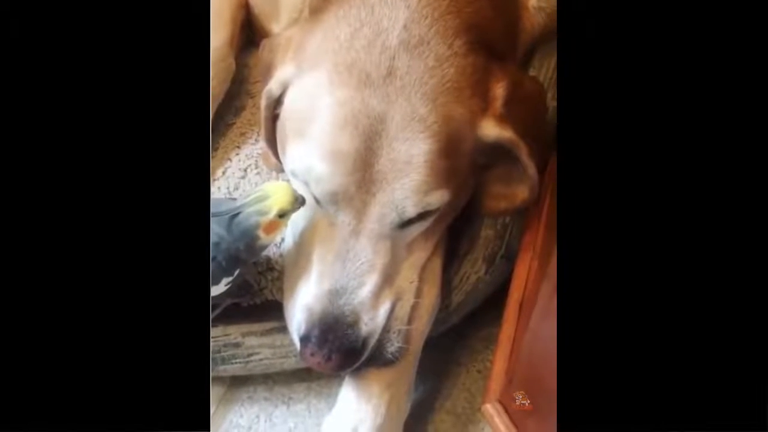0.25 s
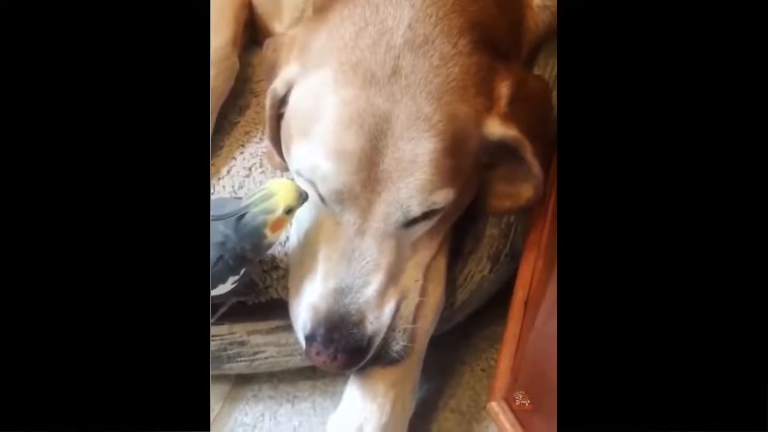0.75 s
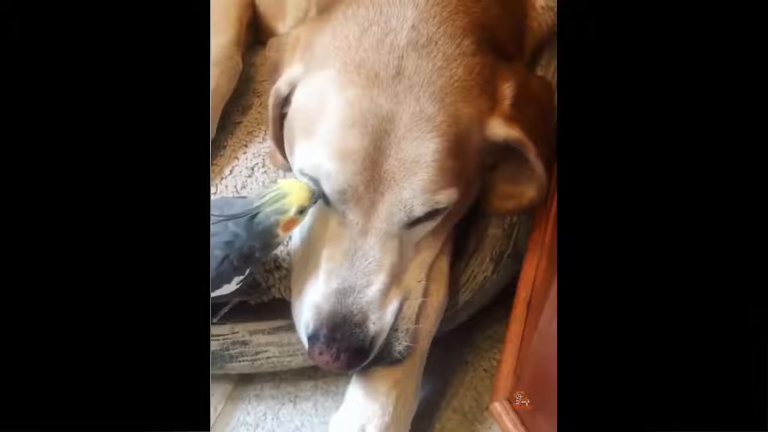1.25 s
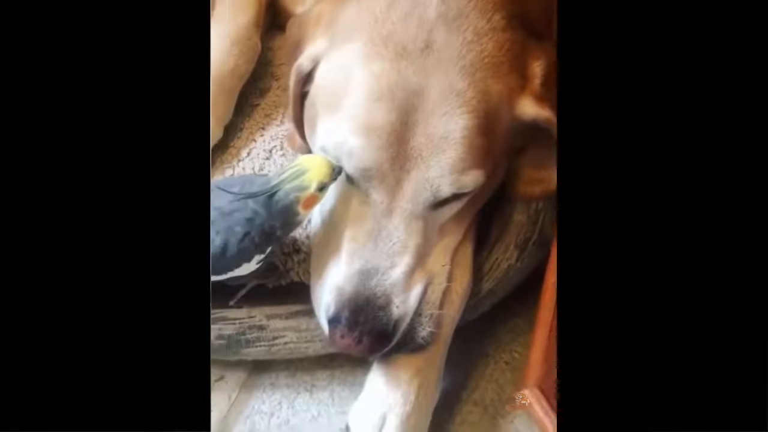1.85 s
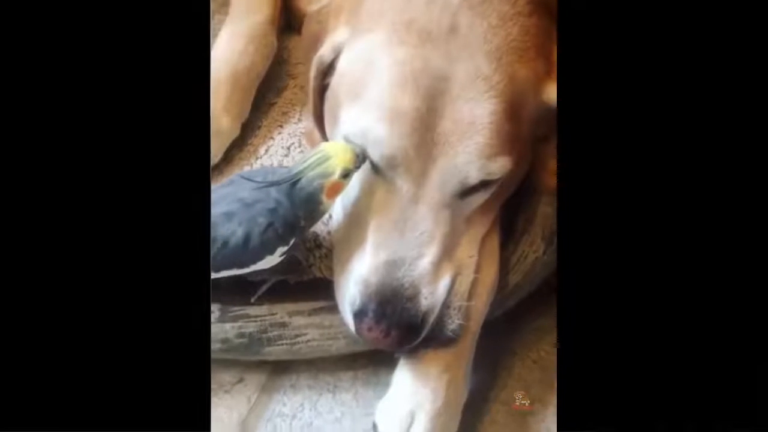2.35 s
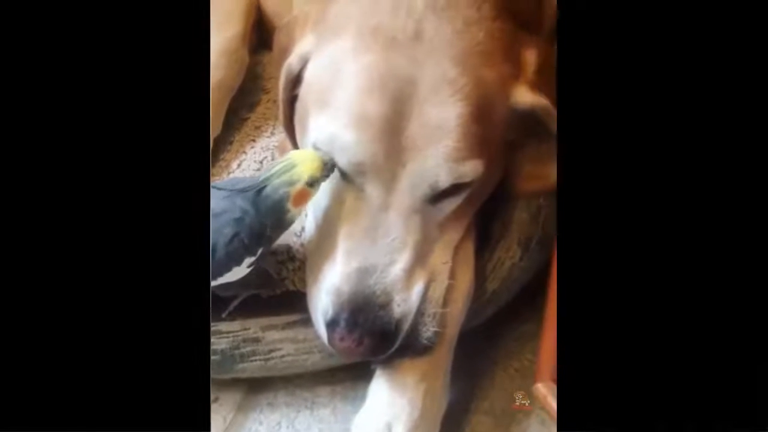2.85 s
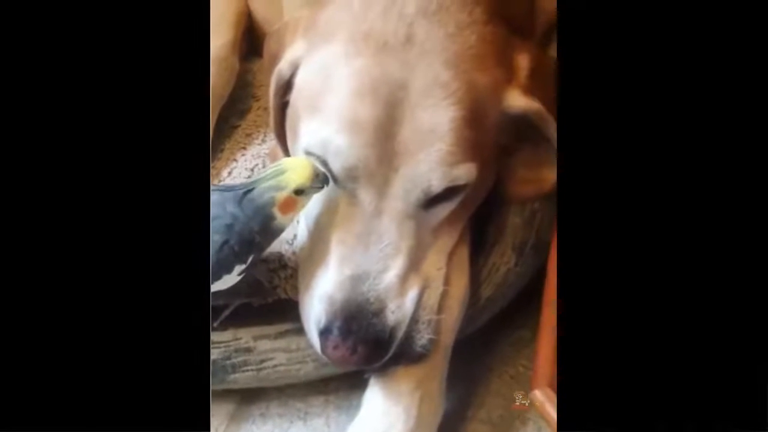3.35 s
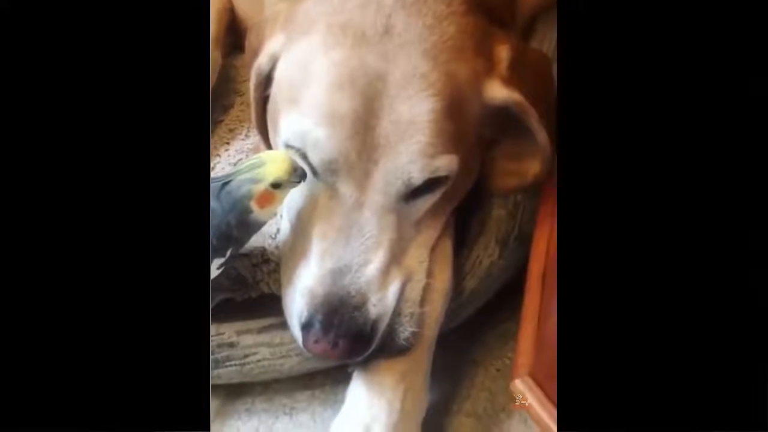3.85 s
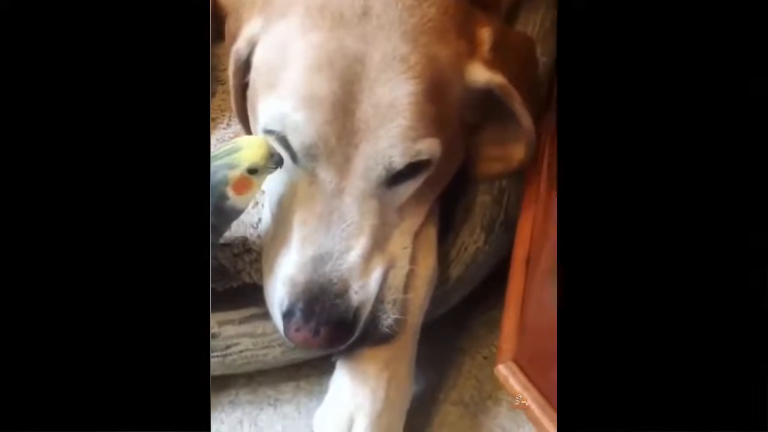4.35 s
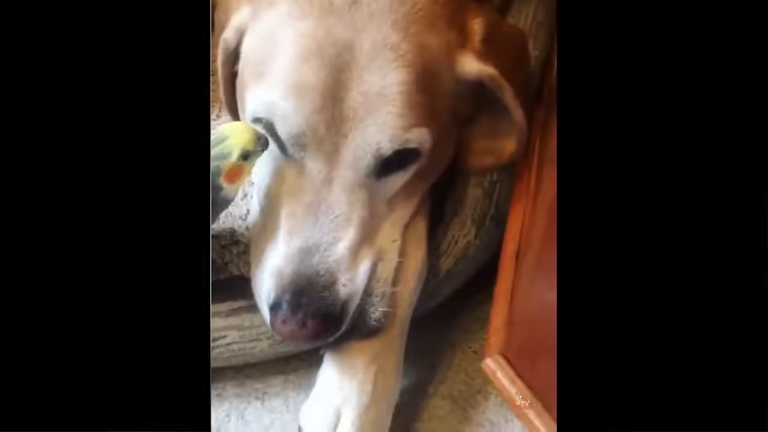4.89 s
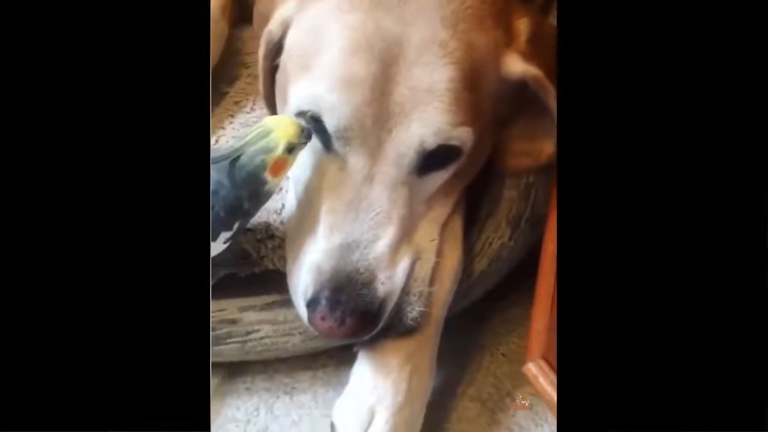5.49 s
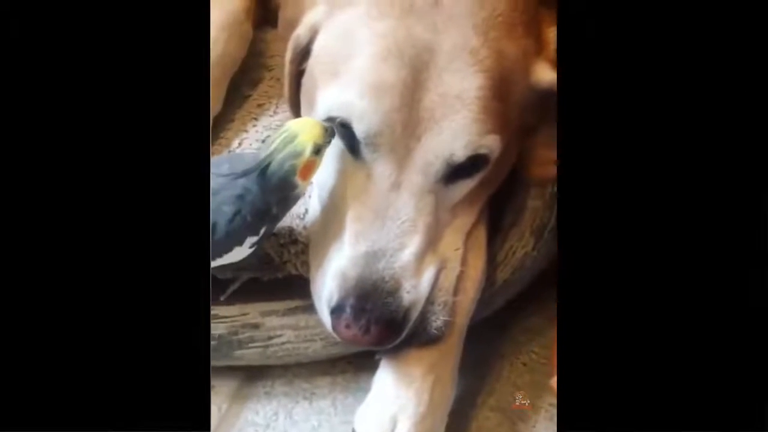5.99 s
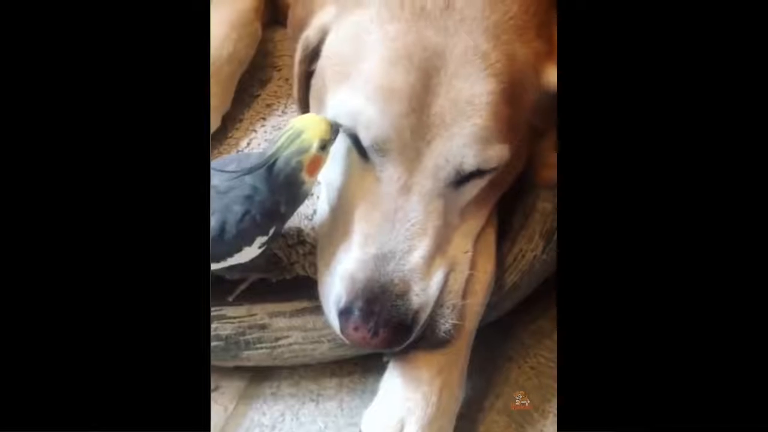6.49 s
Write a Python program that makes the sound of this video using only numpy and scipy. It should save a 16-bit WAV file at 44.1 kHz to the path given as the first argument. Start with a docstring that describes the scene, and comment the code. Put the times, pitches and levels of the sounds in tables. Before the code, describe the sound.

Indoors, close and clear, one small bird alternates slurred whistled warbles with quick dry chirps. Warbles fall from high to low, slightly rough and breathy; two long ones flick up at the end. Chirps come singly or in twos and threes, snapping on and turning pure. Reflections blur each note; low steady hum and a brief deep rumble sit far beneath.

```python
"""A cockatiel sings close by in a small quiet room: short whistled chirps in loose groups,
falling warbles, the longest curling up at the end, brief raspy squawks and one beak click.
The voice is a sine with unsteady overtones and hiss; the rasps are low, irregular pulses.
Noise echoes make each note linger between the walls, over filtered-noise room tone,
the low wavering sines of a household appliance and a deep rumble that swells briefly."""
import sys
import numpy as np
from scipy import signal
from scipy.fft import rfft, irfft
from scipy.io import wavfile
from scipy.ndimage import map_coordinates

SR = 44100
rng = np.random.default_rng(int(sys.argv[2]) if len(sys.argv) > 2 else 0)


def transcribe(u):
    """Save the signal u as a 16-bit wav file named by the first command-line argument.

    u: samples, shape (n,) or (channels, n), limited to [-1, 1]; the rate is SR.
    q: integer samples, one column per channel.
    """
    v = np.clip(np.atleast_2d(u).T, -1, 1)
    q = np.round(v * 32767).astype(np.int16)
    wavfile.write(sys.argv[1], SR, q)


N = 296793  # length in samples
ATTACK_S = .003  # opening of every chirp, warble and rasp


def undb(db):
    """Decibels to gain."""
    return 10 ** (np.asarray(db) / 20)


def unit(x):
    """Scale to rms 1."""
    return x / np.sqrt(np.mean(x ** 2))


def gain_at(hz, points):
    """Read a spectrum of (Hz, dB) points as a gain, interpolated along log frequency."""
    point_hz, point_db = np.transpose(points)
    return undb(np.interp(np.log(hz + 1), np.log(point_hz), point_db))


def colour(x, points):
    """Filter a sound by a spectrum of (Hz, dB) points, leaving its phases alone."""
    gain = gain_at(np.fft.rfftfreq(len(x), 1 / SR), points)
    return irfft(rfft(x) * gain, len(x))


def wander(n, rate):
    """Smooth random motion, spread near 1, with a new value rate times a second."""
    values = rng.standard_normal(4096)
    return map_coordinates(values, [np.arange(n) * rate / SR], order=3, mode="wrap")


def gate(n, attack_s, release_s):
    """Rounded opening and closing of a note."""
    t = np.arange(n) / SR
    opening = np.sin(np.pi / 2 * np.clip(t / attack_s, 0, 1))
    closing = np.sin(np.pi / 2 * np.clip((t[-1] - t) / release_s, 0, 1)) ** 2
    return opening * closing


def add(out, s, x):
    """Mix a sound in at time s."""
    i = max(int(s * SR), 0)
    out[i:i + len(x)] += x[:max(N - i, 0)]


def syrinx(hz, bright_db, press, jitter, flutter_db, hiss_db, slope_db=3.5, break_jitter=0.019):
    """A nearly pure whistle; pressing the throat brings out the octave, and it cracks as it lets go."""
    # Overtone strength against the fundamental, relaxed throat. Each row: frequency in Hz, gain in dB.
    relaxed = [(2500, -23), (3400, -27.5), (4400, -33.5), (5000, -38), (5700, -37), (7000, -39),
               (8200, -46), (9500, -33.5), (11000, -28), (12300, -15.5), (13500, -20.5)]
    # The same with the throat pressed. Each row: frequency in Hz, gain in dB.
    pressed = [(2800, -5), (3300, -6), (4500, -18), (6000, -24), (7500, -32), (8800, -40.5), (10500, -22),
               (12000, -16.5), (13800, -13)]
    # Spectrum of air hissing through the throat. Each row: frequency in Hz, relative level in dB.
    hiss_colour = [(400, -20.5), (900, -13), (1500, -1.5), (2500, -1), (4500, -8), (6500, -20.5),
                   (8200, -23.5), (10000, -18), (12500, -16.5), (14000, -26)]
    n = len(hz)
    unstable = 4 * press * (1 - press)  # greatest halfway between the two registers
    shake = jitter * wander(n, 700) + break_jitter * unstable * wander(n, 1500)
    phase = 2 * np.pi * np.cumsum(hz * (1 + shake)) / SR
    overtones = np.zeros(n)
    for k in range(2, 12):
        throat = gain_at(k * hz, relaxed) ** (1 - press) * gain_at(k * hz, pressed) ** press
        # each overtone is weaker than the last, so high notes reach the treble resonance more strongly
        strength = undb(flutter_db * wander(n, 140) - slope_db * (k - 2.5))
        below_nyquist = k * hz < SR / 2
        overtones += throat * strength * below_nyquist * np.sin(k * phase)
    breath = unit(colour(rng.standard_normal(n), hiss_colour))
    hiss = undb(hiss_db) * (0.25 + 0.96 * press + unstable) * breath
    return np.sqrt(2) * (np.sin(phase) + undb(bright_db) * (overtones + hiss))


def chirps(settle_db=2.5, late_db=5.0, build_s=0.0061):
    """Each chirp snaps on with a pressed throat, then flips into a tone that grows ever purer."""
    # Each row: start in seconds, length in seconds, held pitch in Hz, end pitch in Hz,
    # base level in dB, time the throat stays pressed in seconds, base overtone level in dB.
    chirp_notes = [ (1.477, 0.05647, 1667, 1529, -29.5, 0.012858, -4),
                   (1.827, 0.049704, 1544, 1506, -29, .014, -6),
                   (1.966, 0.03692, 1513, 1573, -30, 0.014933, 2),
                   (2.094, 0.042784, 1665, 1743, -29, 0.017721, 0),
                   (2.377, 0.053146, 1584, 1370, -29.5, 0.013692, -2.5),
                   (2.526, 0.044234, 1380, 1566, -33.5, 0.017156, 0),
                   (2.817, 0.06146, 1666, 1258, -29.5, 0.012573, -3.5),
                   (2.972, 0.036097, 1438, 1500, -29.5, 0.01701, -3),
                   (3.081, 0.039438, 1779, 1778, -28.5, .05, -2.5),
                   (3.335, .072, 1579, 1174, -28.5, .008, -4),
                   (4.888, 0.050727, 1544, 1524, -28, 0.012543, -3),
                   (5.228, 0.046244, 1490, 1496, -28, 0.01111, -4.5),
                   (5.378, 0.032255, 1399, 1459, -31, 0.025, -5.5),
                   (5.657, 0.048146, 1556, 1471, -28.5, 0.01431, -4),
                   (5.807, 0.029412, 1438, 1397, -30.5, 0.02327, -2),
                   (5.93, 0.03583, 1661, 1779, -27.5, 0.029566, -2.5),
                   (6.22, 0.04826, 1591, 1708, -29, 0.010517, -1.5),
                   (6.369, 0.035295, 1517, 1450, -30, 0.01628, 1.5),
                   (6.527, 0.032835, 1468, 1601, -29, 0.017817, -0.5)]
    # every chirp glides from the same pitch to its own, swells in the middle and flicks away at its close
    start_hz, glide_s, flick_s, arch_db = 1465.9, 0.033025, .007, 1
    out = np.zeros(N)
    for s, length, held_hz, end_hz, db, pressed_s, bright_db in chirp_notes:
        t = np.arange(int(length * SR)) / SR
        glide = np.sin(np.pi / 2 * np.minimum(t / glide_s, 1))
        flick = np.exp((t - length) / flick_s)
        hz = start_hz + (held_hz - start_hz) * glide + (end_hz - held_hz) * flick
        press = .5 - .5 * np.tanh((t - pressed_s) / 0.0023)
        # the fundamental builds up later than its overtones and swells in the middle
        swell_db = arch_db * np.sin(np.pi * t / length) - late_db * np.exp(-t / build_s)
        relaxed_db = (1 - press) * (1.5 + settle_db * t / length)
        overtone_db = bright_db - swell_db - relaxed_db
        note = syrinx(hz, overtone_db, press, jitter=.003, flutter_db=4.0, hiss_db=-32.0)
        add(out, s, note * undb(db + swell_db) * gate(len(t), ATTACK_S, 0.005864))
    return out


def warbles():
    """Slightly rough slurs that fall from a high whistle; the longest curl up again."""
    # Each row: start in seconds, length in seconds, top pitch in Hz, scoop up to it in Hz (negative
    # comes from above), hold of the top in seconds, fall time in seconds, closing curl in Hz (none
    # unless positive), base level in dB, loudest moment in seconds after the start,
    # softer start in dB (negative starts louder), base overtone level in dB.
    slurs = [ (0, 0.028755, 2159, 4, 0.007599, 0.006444, -3.5, -30.5, 0.003373, -6.5, 7.5),
             (0.239, .108, 2314, 260, .049, .022, 0, -24.5, .048, 3.5, 5),
             (0.355, 0.24423, 2302, -1.5, .031, 0.045, 469.5, -24.5, 0.074984, 21, 4),
             (3.449, 0.078387, 2534, 320.5, .021, .028, -0.5, -24.5, 0.015, 10, 4.5),
             (3.753, .116, 2115, 4.5, .039, .031, 0, -26.5, 0.06789, 8.5, 1.5),
             (3.882, 0.24997, 2142, 90, .041, 0.05659, 448.5, -23, 0.076443, 21.5, 3.5)]
    # a warble scoops to its top, sags, then drops until it rests on the bird's lowest note
    scoop_s, sag_hz_per_s = .006, 1900
    bottom_hz, fall_aim_hz, fall_shape, curl_s = 1291.2, 1211.3, 1.22, .068
    waver_share, waver_per_s = .005, 170
    # past its loudest point it eases off, and a curl lifts it again; it ends purer than it began
    ease_db, ease_s, curl_lift_db, purer_db = 10, 0.022, 3.5, 8.5
    # halfway down the voice cracks: the pitch shakes and the overtones dip
    crack_share, crack_per_s, crack_loss_db = .012, 1100, 1
    out = np.zeros(N)
    for (s, length, top_hz, scoop_hz, held_s, fall_s, curl_hz,
         db, loudest_s, softer_db, overtones_db) in slurs:
        t = np.arange(int(length * SR)) / SR
        n = len(t)
        top = top_hz - scoop_hz * np.exp(-t / scoop_s) - sag_hz_per_s * np.minimum(t, held_s)
        height = np.exp(-(np.maximum(t - held_s, 0) / fall_s) ** fall_shape)
        curl_progress = np.clip(1 + (t - length) / curl_s, 0, 1)
        curl = (curl_hz > 0) * (1 - np.cos(np.pi / 2 * curl_progress))
        hz = np.maximum(fall_aim_hz + (top - fall_aim_hz) * height, bottom_hz) + curl_hz * curl
        crack = (4 * height * (1 - height)) ** 3
        waver = waver_share * wander(n, waver_per_s)
        hz = hz * (1 + waver + crack_share * crack * wander(n, crack_per_s))
        swell_db = -softer_db * np.maximum(1 - t / loudest_s, 0)
        easing = 1 - np.exp(-np.maximum(t - loudest_s, 0) / ease_s)
        late_db = curl_lift_db * np.sin(np.pi * curl) - ease_db * easing
        bright_db = overtones_db - crack_loss_db * crack - purer_db * (t / length) ** 3
        note = syrinx(hz, bright_db, 0, jitter=.005, flutter_db=4.0, hiss_db=-28.5)
        level = undb(db + swell_db + late_db + 1.2 * wander(n, 110))
        add(out, s, note * level * gate(n, ATTACK_S, 0.0024))
    return out


def ringing(ring_hz=2603, db=-37, t60=0.34):
    """A high whistle, already sounding at the start, dies away under the first slur."""
    t = np.arange(N) / SR
    level = undb(db - 60 * t / t60 + 1.5 * wander(N, 50.9))
    return np.sqrt(2) * level * np.sin(2 * np.pi * ring_hz * t)


def rasps(throb_hz=84, throb_depth=0.26, wobble=0.083):
    """The membranes drop to a low, irregular flapping; pitch and strength throb together."""
    # Each row: start in seconds, length in seconds, start pitch in Hz, end pitch in Hz,
    # level in dB, random pitch scatter as a share of the pitch.
    squawks = [(0.032, 0.009794, 755, 622.5, -34.5, 0.10413), (0.058, 0.01667, 742.9, 667.4, -41, 0.0653),
               (0.073, 0.05075, 837.9, 763.4, -34.5, 0.13397), (0.123, 0.017, 738, 655.3, -37.5, .1),
               (0.342, 0.014903, 699.6, 654.5, -38, 0.12), (3.583, 0.02, 703.6, 669.6, -41, 0.12813),
               (3.598, 0.015228, 771.5, 629.7, -37.5, 0.0583), (3.862, 0.018726, 667.8, 695, -40, 0.24495)]
    # Throat resonances during a rasp. Each row: frequency in Hz, relative gain in dB.
    rasp_colour = [(300, -27.5), (700, -22), (1050, -17.5), (1400, 4), (1900, -3), (2700, -13),
                   (4000, -29.5), (6000, -31), (8200, -28.5), (10000, -32), (12500, -16.5), (14000, -32)]
    out = np.zeros(N)
    for s, length, start_hz, end_hz, db, scatter in squawks:
        n = int(length * SR)
        throb = np.sin(2 * np.pi * np.cumsum(throb_hz * (1 + 0.22 * wander(n, 87))) / SR)
        hz = np.linspace(start_hz, end_hz, n) * (1 + wobble * throb + scatter * wander(n, 260.26))
        phase = 2 * np.pi * np.cumsum(hz) / SR
        pulses = unit(sum(np.cos(k * phase) for k in range(1, 7)))
        breathy = pulses + rng.standard_normal(n) / 2
        strength = (1 + throb_depth * throb) * undb(2 * wander(n, 200))
        rasp = unit(colour(breathy * strength, rasp_colour))
        add(out, s, rasp * undb(db) * gate(n, ATTACK_S, ATTACK_S))
    return out


def clicks(ring_s=0.0029):
    """The beak snaps with a very short, exponentially dying ring."""
    # Each row: time in seconds, starting level in dB, ring frequency in Hz.
    snaps = [(3.7643, -41.5, 2465)]
    out = np.zeros(N)
    t = np.arange(SR // 50) / SR
    for s, db, hz in snaps:
        add(out, s, undb(db) * np.exp(-t / ring_s) * np.sin(2 * np.pi * hz * t))
    return out


def nearby(x, first_s=0.0029, fade_s=0.014):
    """Quick bounces off the floor and bedding blur the gliding overtones."""
    # Treble bouncing back off things close by. Each row: frequency in Hz, gain in dB.
    bounce_colour = [(1500, -17.5), (2300, -14), (3500, -14.5), (6000, -9), (12000, -10)]
    t = np.arange(SR // 20) / SR
    bounces = rng.standard_normal(len(t)) * (t > first_s) * np.exp(-t / fade_s)
    return signal.fftconvolve(colour(x, bounce_colour), unit(bounces) / np.sqrt(len(t)))[:N]


def room(x, early_db=-19, early_t60=0.24, late_db=-16.0, late_t60=0.48935, gap_s=0.0044):
    """Sparse echoes off floor and furniture, with a longer diffuse tail."""
    # What the walls send back. Each row: frequency in Hz, relative gain in dB.
    wall_colour = [(500, -11), (1500, 5.5), (3000, 7), (5000, 4), (8000, 5.5), (13000, -4)]
    t = np.arange(SR) / SR
    arrived = np.clip(t / gap_s - 1, 0, 1)  # silent for one gap, then fades in over another
    sparse = rng.standard_normal(SR) * (rng.random(SR) < 900 / SR)  # about 900 echoes a second
    early = sparse * arrived * np.exp(-np.log(1000) * t / early_t60)
    late = rng.standard_normal(SR) * arrived * np.exp(-np.log(1000) * t / late_t60)
    response = (undb(early_db) * unit(early) + undb(late_db) * unit(late)) / np.sqrt(SR)
    return signal.fftconvolve(colour(x, wall_colour), response)[:N]


def room_tone(level_db=-61.5):
    """Soft, steady air noise: white noise shaped by a spectrum."""
    # Spectrum of the air in the room. Each row: frequency in Hz, relative level in dB.
    air_colour = [(15, -52), (25, -33.5), (48, -3), (87, -9.5), (113, -5), (293, -16), (326, -32.5),
                  (353, -6.5), (382, -19), (966, -26.5), (1600, -31.5), (1920, -30), (2080, -37.5),
                  (5690, -44.5), (14000, -49)]
    return unit(colour(rng.standard_normal(N), air_colour)) * undb(level_db)


def appliance_hum():
    """Low sines that waver slightly in pitch and level."""
    # Each row: centre frequency in Hz, centre level in dB.
    hum_tones = [(58.5, -70), (119, -67), (295, -77), (357.3, -78.5)]
    out = np.zeros(N)
    for hz, db in hum_tones:
        level = undb(db + 0.5 * wander(N, 5.6))
        phase = 2 * np.pi * np.cumsum(hz + .5 * wander(N, 4)) / SR
        out += np.sqrt(2) * level * np.sin(phase)
    return out


def rumble():
    """Noise in a low band swells briefly and sinks back to a faint, steady level."""
    # Each row: time in seconds, level in dB.
    swell = [(.1, -73.5), (0.551, -62.5), (.85, -57), (1.05, -72)]
    low_band = signal.butter(2, [48, 72], "bandpass", fs=SR, output="sos")  # Hz
    deep = unit(signal.sosfilt(low_band, rng.standard_normal(N)))
    return deep * undb(np.interp(np.arange(N) / SR, *np.transpose(swell)))


def scene():
    """The bird heard directly and through its room, over the background."""
    # The beak points away, so less treble comes straight. Each row: frequency in Hz, gain in dB.
    direct_colour = [(2500, 1.5), (4000, -2), (7000, 0.5), (12000, -0.5)]
    bird = chirps() + warbles() + ringing() + rasps() + clicks()
    background = room_tone() + appliance_hum() + rumble()
    return (colour(bird, direct_colour) + nearby(bird) + room(bird) + background)[None]


def record(dry, top_hz=13900):
    """A steep elliptic low-pass cuts the top of the treble."""
    low_pass = signal.ellip(10, .2, 70, top_hz, fs=SR, output="sos")  # ripple and stopband in dB
    return signal.sosfilt(low_pass, dry)


dry = scene()
out = record(dry)
transcribe(out)
```